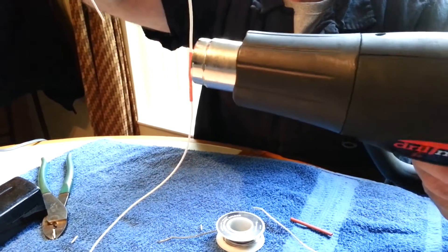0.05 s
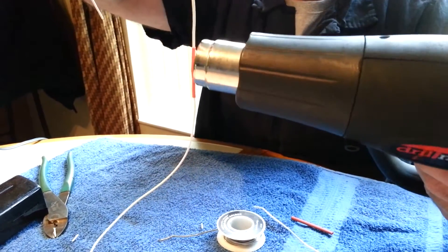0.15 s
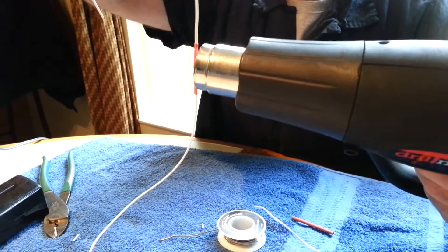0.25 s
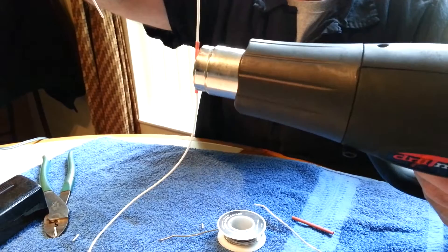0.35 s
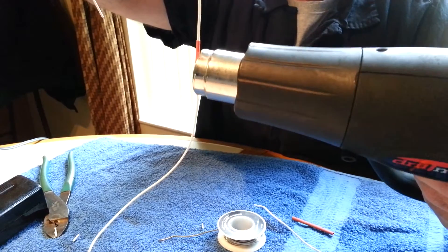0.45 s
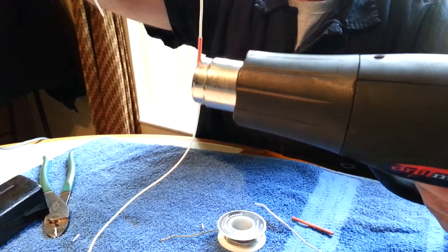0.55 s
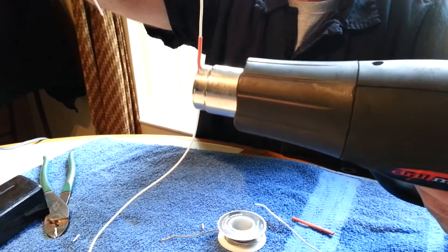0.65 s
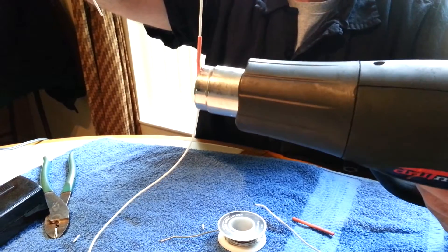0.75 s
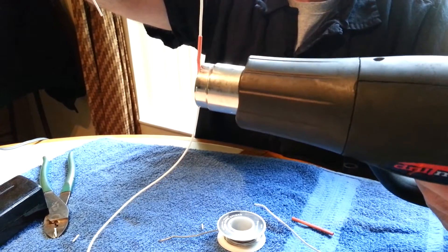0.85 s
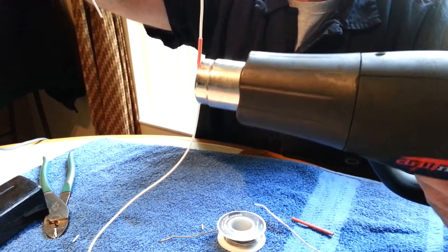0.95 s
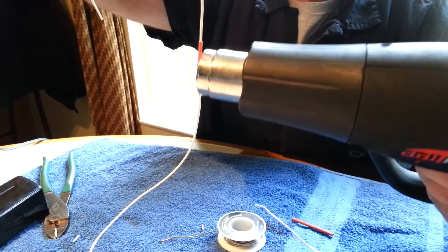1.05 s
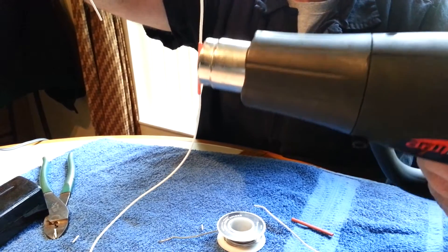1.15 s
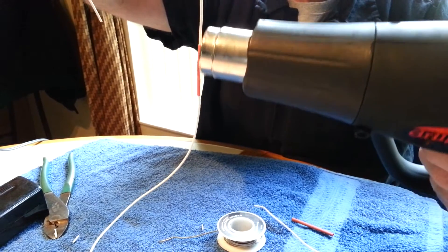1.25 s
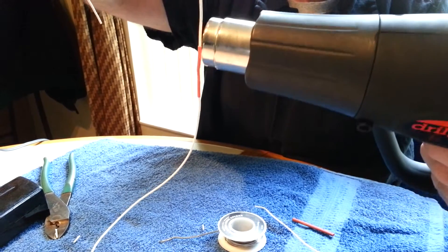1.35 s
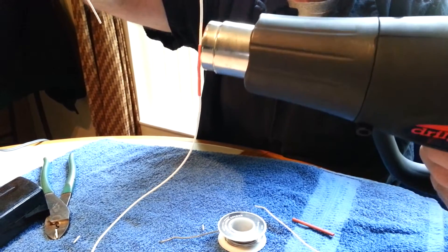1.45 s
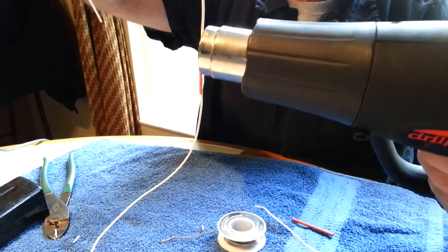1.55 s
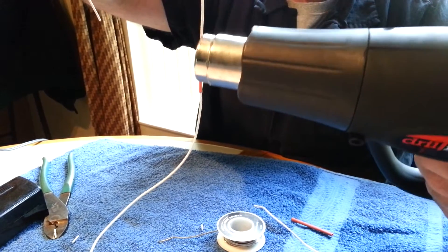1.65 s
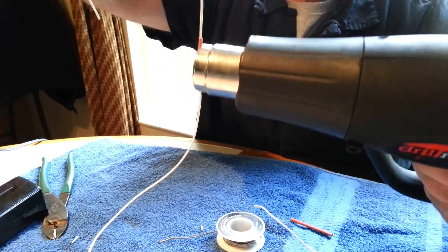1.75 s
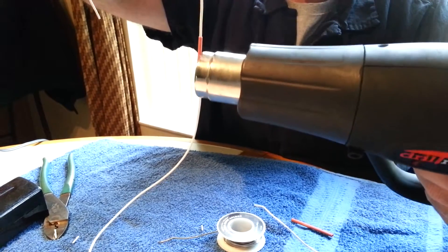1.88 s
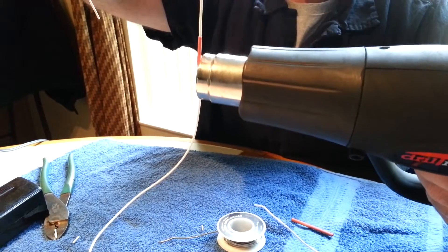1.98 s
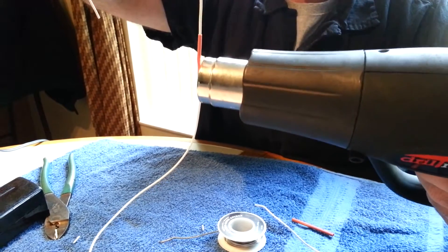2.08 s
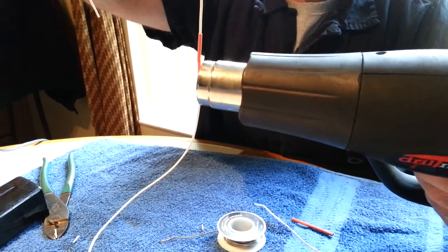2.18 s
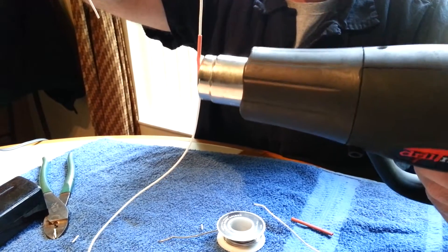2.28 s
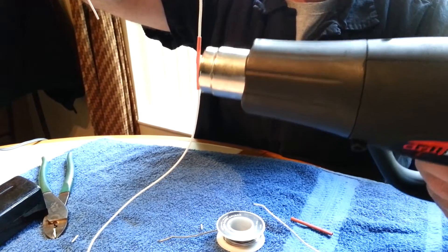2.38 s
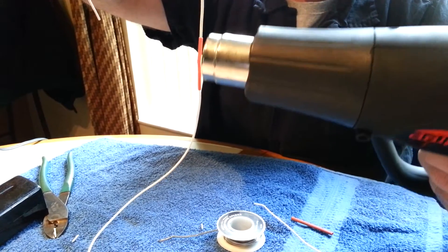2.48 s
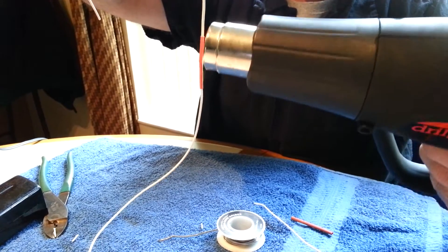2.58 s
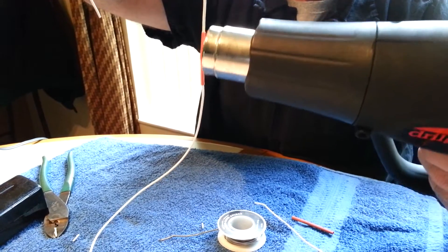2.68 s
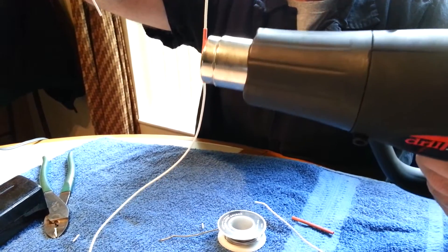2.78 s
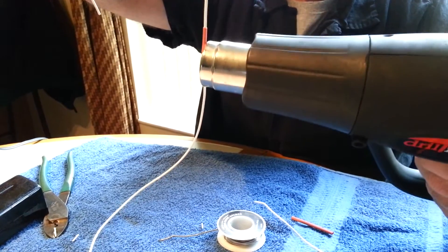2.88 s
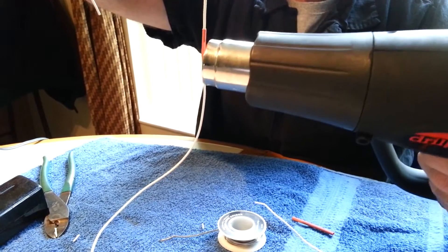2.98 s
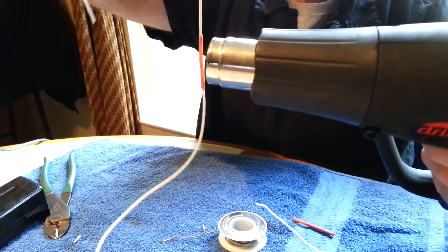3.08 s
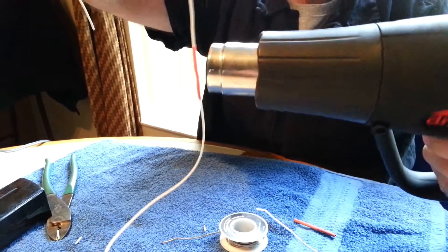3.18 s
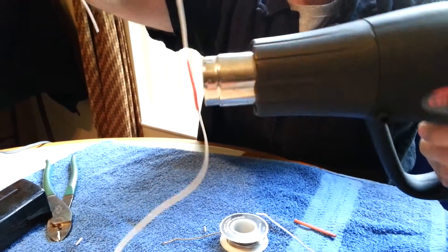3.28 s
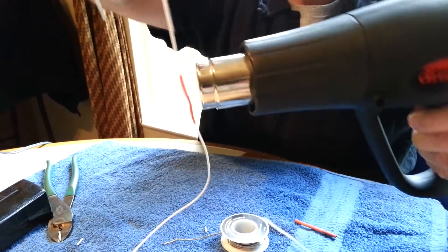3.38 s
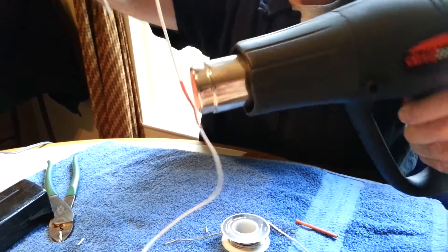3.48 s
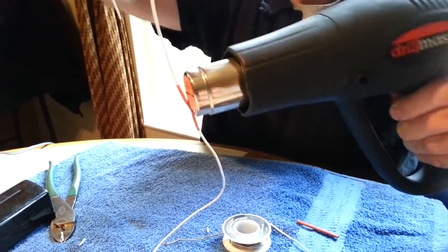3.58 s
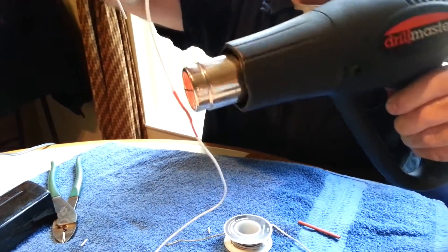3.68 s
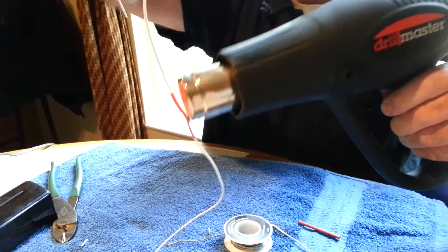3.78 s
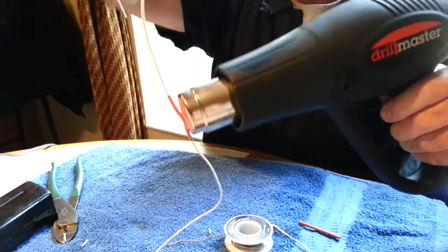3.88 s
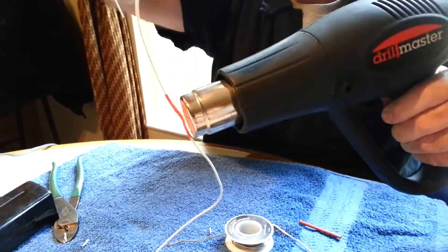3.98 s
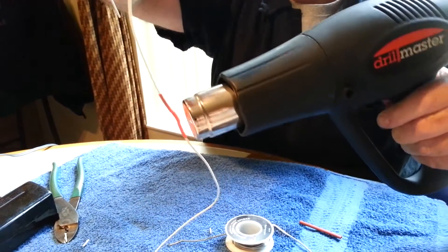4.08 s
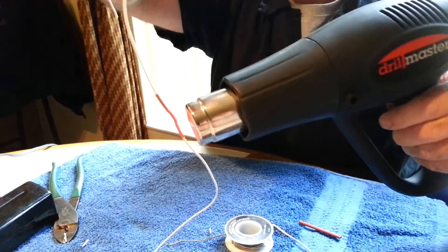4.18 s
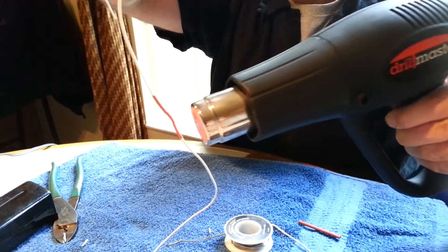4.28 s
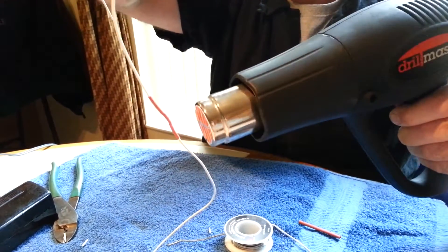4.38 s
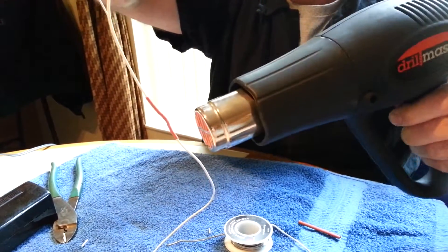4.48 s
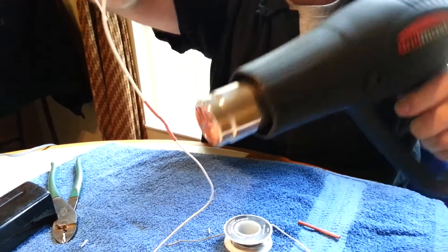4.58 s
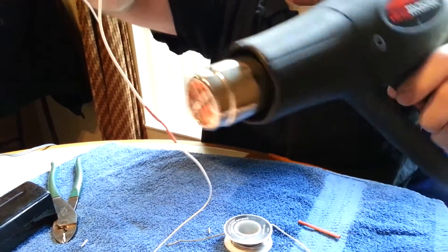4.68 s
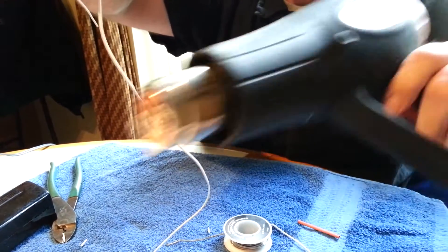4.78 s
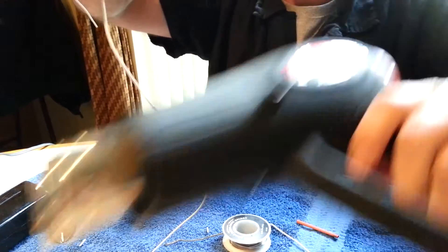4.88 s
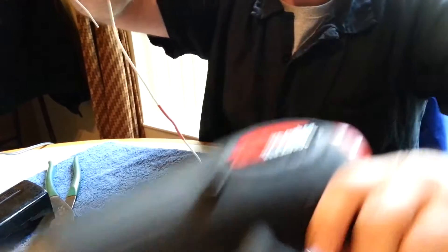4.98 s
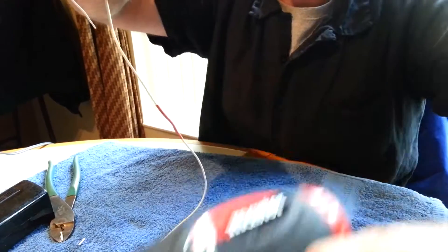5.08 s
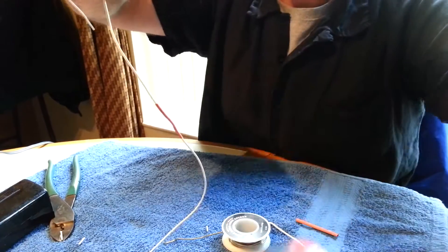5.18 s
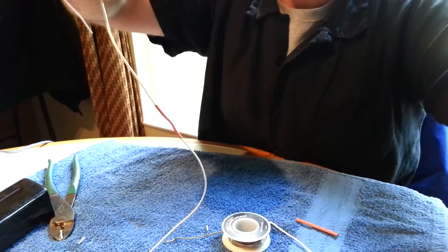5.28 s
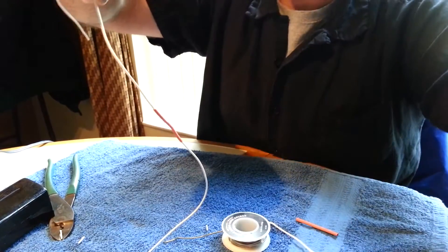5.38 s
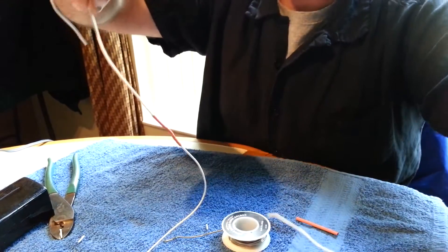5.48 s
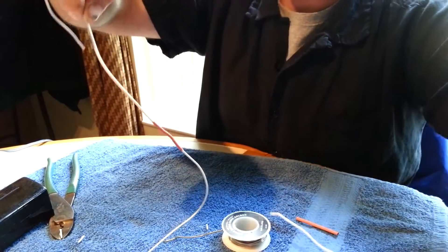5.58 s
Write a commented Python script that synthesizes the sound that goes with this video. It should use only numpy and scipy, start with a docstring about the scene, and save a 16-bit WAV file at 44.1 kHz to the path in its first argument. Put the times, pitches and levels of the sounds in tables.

```python
"""A heat gun blows over a wire joint close by: turbulence roars in the barrel and hisses at the nozzle,
and the fan hums and whines at harmonics of its shaft speed. At times the level jumps and settles back.
It is turned aside and switched off; friction slows the fan, so the tones glide down and the air fades.
The plastic clicks a few times, and the gun is set down with two knocks that ring the table top.
The room is small, and the right microphone hears little treble."""
import sys
import numpy as np
from scipy import signal
from scipy.fft import rfft, irfft, next_fast_len
from scipy.io import wavfile
from scipy.ndimage import map_coordinates

SR = 44100
rng = np.random.default_rng(int(sys.argv[2]) if len(sys.argv) > 2 else 0)


def log_audio(samples):
    """Write samples as a 16-bit WAV file to the path given in sys.argv[1]."""
    # one column per channel
    frames = np.atleast_2d(samples).T
    # limit to full scale, then quantise
    limited = np.clip(frames, -1, 1)
    pcm = np.round(limited * 32767).astype(np.int16)
    wavfile.write(sys.argv[1], SR, pcm)


N = 249165

# reverberation of the room: (frequency [Hz], t60 [s])
ROOM_DECAY = [(150, 0.26), (2000, 0.37), (10000, 0.39)]
# likeness of the two sides: (frequency [Hz], correlation [-1 to 1])
COHERENCE = [(130, 0.38), (240, 0.93), (400, 0.28), (600, 0.87), (1050, 0.87), (1400, 0.12), (2000, 0.053),
             (3300, 0.5), (4500, 0.38), (6700, 0.031)]
# right microphone against the left: (frequency [Hz], gain [dB], phase lag [rad])
RIGHT_RESPONSE = [(120, 4, 0.36), (257, -1.8, 0.3), (805, -2.5, .15), (1010, -4.5, 0.66), (1530, -1, -1.14),
                  (1980, 2, -0.35), (3160, -1, -0.96), (4200, -5.5, 1), (6800, -7.5, -0.16),
                  (8460, -15, -1.1), (13900, -44, 0)]
# gun meets table: (time [s], thump gain [dB], crack level [dB], t60 multiplier [ratio])
IMPACTS = [(5.4694, -6, -10.5, 0.9), (5.5788, -8, -13, 1.2), (5.6014, -16, -23, 0.88)]
# modes of table top and housing: (frequency [Hz], relative level [dB], t60 [s])
TABLE_MODES = [(98, -21, 0.18), (128, -11, 0.14), (171, -12.5, 0.15), (195, -8.5, 0.13), (244, 1.5, 0.061),
               (358, -8, 0.066), (410, -6.5, 0.03), (860, -9.5, .035), (1194, -13.5, 0.033),
               (1526, -14.5, 0.044), (3800, -29, 0.014), (4850, -14, .02)]
# struck housing: (frequency [Hz], relative spectral density [dB])
CRACK_SPECTRUM = [(60, -38), (250, 7), (900, 0), (2200, -8), (4200, -4.5), (6500, -12), (9000, -18.5),
                  (14000, -28)]
# switch and housing: (time [s], level [dB], centre [Hz], half-width [octaves], t60 [s], ring gain [dB])
SNAPS = [(4.3439, -8.5, 4440, 0.24, 0.017, -12.5), (4.3445, -16, 9000, 1.3, .008, -20),
         (4.9678, -24.5, 760, 0.52, 0.018, -21), (5.1626, -19.5, 3140, 0.82, 0.011, -20),
         (5.352, -16.5, 4950, 1.3, 0.0099, -29)]
# turning of the gun: (time [s], share turned aside [0-1])
TURN_PATH = [(3.1, 0.02), (3.5, 0.97)]
# brief jumps in the level of the sound: (peak time [s], height [dB], rise time [s])
LEVEL_JUMPS = [(.555, 1.5, .03), (1.02, 4.5, 0.035), (1.16, 4.5, 0.041), (1.545, 8.5, 0.0099),
               (1.74, 4.5, 0.034), (2.27, 5, .022), (3.07, 4.5, 0.076), (4.37, 6, 0.047)]
# fan tones: (order [multiple of shaft speed], side-on level [dB], turned-aside level [dB])
FAN_HARMONICS = [(1, -45, -43), (4, -36, -42), (11, -65, -58), (12, -35.5, -49), (15, -49.5, -42.5),
                 (16, -42, -73), (18, -50, -58), (19, -45, -52), (20, -41, -58), (24, -51, -47.5),
                 (25, -44.5, -53), (26, -52.5, -67), (30, -46.5, -50.5), (31, -38.5, -61), (35, -67, -42),
                 (36, -47, -61), (38, -42.5, -81), (39, -59, -41.5), (40, -33, -30.5), (41, -43, -36.5),
                 (44, -87, -36), (45, -33, -45), (46, -39.5, -40), (47, -73, -52), (50, -40, -55),
                 (51, -39.5, -56), (53, -44, -63), (55, -36.5, -46), (56, -42, -52), (58, -45, -53),
                 (59, -40, -54)]
# swing of the whine while the gun points aside: (time [s], relative level [dB])
WHINE_BEAM = [(3.35, -32), (3.404, -34), (3.482, -43.5), (3.538, -36), (3.668, -33.5), (4.096, -35.5),
              (4.226, -40), (4.33, -37.5)]
# what the shell radiates of a gliding tone: (frequency [Hz], level [dB])
SHELL_RESPONSE = [(200, -64), (600, -46), (1150, -50), (1500, -55), (2200, -56), (3400, -55.5),
                  (4300, -53.5), (5700, -46.5), (7500, -64), (10000, -49.5), (14000, -61)]
# low rumble of the flow: (frequency [Hz], relative spectral density [dB])
RUMBLE_SPECTRUM = [(30, -46), (55, -38), (80, -33), (128, -12), (160, -20), (210, -2.5), (300, -6),
                   (420, -9.5), (700, -38.5)]
# spectral shapes of the barrel's roar: (frequency [Hz], side-on [dB], turned aside [dB], coasting [dB])
BARREL_SPECTRA = [(325, -27, -33, -39), (448, -27, -23, -19), (531, -11.5, -15.5, -1.5), (637, -10, -4, -7),
                  (727, -6, -16, 1), (854.5, 2, 2, -1.5), (1070, 0, -8, 1), (1173, -7, -4.5, 4.5),
                  (1317, -14, -10, -13), (1850, -22, -23.5, -42)]
# spectral shapes of the nozzle's hiss: (frequency [Hz], side-on [dB], turned aside [dB], coasting [dB])
NOZZLE_SPECTRA = [(900, -15, -24, -37), (1430, -10, -5, -3), (2370, -8, -12, -12), (2660, -2.5, -0.5, -7),
                  (3180, -5, -11.5, -8), (3450, 1.5, -1.5, -7), (4330, -1, -1, 0.5), (5050, -8, -11.5, -6),
                  (6800, -17.5, -16.5, -3), (7350, -11.5, -11.5, -4.5), (10200, -9, -17, -6.5),
                  (12400, -10.5, -14, -11.5), (14600, -15.5, -15.5, -13.5)]

OFF_S, COAST_S = 4.343, 0.745  # power is cut; time in which the speed then falls by 1/e
AWAY_S, AWAY_TAKES_S = 4.88, 0.21  # the gun is swung away past the microphones
SHAFT_HZ, SAG_HZ, WANDER_HZ = 244.05, 0.5, 0.12  # the speed sags with the gun turned aside
BLADE_ORDERS, COMMUTATOR_SEGMENTS = (12, 18), 5
HOP = 64  # samples per step of a slow curve
TIME = np.arange(N) / SR


def amp(db):
    """Amplitude ratio of a level in decibels."""
    return 10 ** (np.asarray(db) / 20)


def along(points, hz, column=1):
    """A table column interpolated on a logarithmic frequency axis."""
    columns = np.transpose(points)
    return np.interp(np.log(hz + 1), np.log(columns[0] + 1), columns[column])


def wobble(rate, step=1):
    """Smooth random modulation: rate knots a second, one value every step samples."""
    coarse = np.arange(0, N, HOP)
    slow = map_coordinates(rng.standard_normal(int(N * rate / SR) + 4), [coarse * rate / SR])
    return np.interp(np.arange(0, N, step), coarse, slow)


def filtered(x, response):
    """Linear filtering: the spectrum is multiplied by a frequency response."""
    size = x.shape[-1]
    padded = next_fast_len(size + 8192)
    return irfft(rfft(x, padded) * response(np.fft.rfftfreq(padded, 1 / SR)), padded)[..., :size]


def noise(colour_db, size=N):
    """Partly coherent stereo noise of rms 1: the ratio of mid to side sets the correlation."""
    def response(hz):
        angle = np.arccos(np.clip(along(COHERENCE, hz), -1, 1)) / 2
        return amp(colour_db(hz)) * [np.cos(angle), np.sin(angle)]
    mid, side = filtered(rng.standard_normal((2, size)), response)
    pair = np.array([mid + side, mid - side])
    return pair / np.sqrt(np.mean(pair ** 2) + 1e-20)


def add(track, start_s, sound):
    """Superposition of a sound on the track."""
    part = track[:, round(start_s * SR):][:, :sound.shape[-1]]
    part += sound[..., :part.shape[-1]]


def room(x):
    """Reverberation: a diffuse tail decays exponentially, each frequency at its own rate."""
    hz, t, spectrum = signal.stft(noise(np.zeros_like, SR // 2), SR, nperseg=256)
    decay = amp(-60 * t / along(ROOM_DECAY, hz)[:, None])
    tail = signal.istft(spectrum * decay, SR, nperseg=256)[1]
    delayed = np.pad(tail, ((0, 0), (SR // 200, 0))) / np.linalg.norm(tail[0])
    return signal.fftconvolve(x, delayed, axes=1)[:, :N]


def table_knocks(crack_t60=0.036):
    """Impact excites damped modes: the table top thumps while the housing cracks."""
    out, t = np.zeros((2, N)), np.arange(SR // 3) / SR
    low_cut = signal.butter(2, 85, "high", fs=SR, output="sos")  # a small top radiates no deep bass
    for start_s, thump_db, crack_db, t60_scale in IMPACTS:
        modes = np.zeros_like(t)
        for k, (hz, db, t60) in enumerate(TABLE_MODES):
            envelope = amp(db + rng.normal(0, 1) - 60 * t / (t60 * t60_scale))
            modes += (-1) ** k * envelope * np.sin(2 * np.pi * hz * t)
        thump = signal.sosfilt(low_cut, modes)
        crack = noise(lambda hz: along(CRACK_SPECTRUM, hz), len(t)) * amp(-60 * t / crack_t60)
        add(out, start_s, amp(thump_db) * thump + amp(crack_db) * crack)
    return out


def plastic_clicks(ring_t60=0.083, lowest_hz=150):
    """Transients: each snap of plastic is a damped band of noise with a faint ring of the housing."""
    out, t = np.zeros((2, N)), np.arange(SR // 4) / SR
    for start_s, db, centre_hz, octaves, t60, ring_db in SNAPS:
        def band_db(hz):
            detuning = np.log2((hz + 1) / centre_hz) / octaves
            return -20 * np.log10(1 + detuning ** 2) - 40 * (hz < lowest_hz)
        envelope = amp(-60 * t / t60) + amp(ring_db - 60 * t / ring_t60)
        add(out, start_s, amp(db) * envelope * noise(band_db, len(t)))
    return out


def motion():
    """Shares (0-1) of full speed, which friction decays exponentially, of the turn and of the swing."""
    speed = np.exp(-np.maximum(TIME - OFF_S, 0) / COAST_S)
    aside = np.clip(np.interp(TIME, *np.transpose(TURN_PATH)), 0, 1)
    away = np.clip((TIME - AWAY_S) / AWAY_TAKES_S, 0, 1)
    return speed, aside, away


def jump_db(settle_s):
    """Level above the steady sound: each jump rises linearly and relaxes exponentially."""
    return sum(db * np.clip(1 + (TIME - peak_s) / rise_s, 0, 1)
               * np.exp(-np.maximum(TIME - peak_s, 0) / settle_s) for peak_s, db, rise_s in LEVEL_JUMPS)


def fan_tones(weak_db=-55, hum_db=1, blade_db=11.5, commutator_db=8.5, jitter=0.00028, spread_rad=0.068):
    """Periodic forcing: shaft, blades and commutator sound harmonics of one speed and fall together."""
    speed, aside, away = motion()
    shaft_hz = (SHAFT_HZ - SAG_HZ * aside + WANDER_HZ * wobble(3)) * speed * (1 + jitter * wobble(60))
    shaft_angle = 2 * np.pi * (np.cumsum(shaft_hz) / SR % 1)
    speed, aside, away = speed[::HOP], aside[::HOP], away[::HOP]
    gliding = np.clip((1 - speed) / 0.13, 0, 1)
    strong = {round(order): levels for order, *levels in FAN_HARMONICS}
    overall_db = -1.5 + 5.5 * np.log2(speed) - 7 * away
    lift_db = jump_db(settle_s=0.12)[::HOP]
    beam_times, beam_levels = np.transpose(WHINE_BEAM)
    beam_db = (np.interp(TIME[::HOP], beam_times, beam_levels) - beam_levels.mean()) * aside
    out = np.zeros((2, N))
    for order in range(1, 81):
        is_blade = order in BLADE_ORDERS
        is_commutator = order % COMMUTATOR_SEGMENTS == 0 and order > 20
        side_on_db, turned_db = strong.get(order, (weak_db, weak_db))
        sway_db = beam_db + 1.33 * wobble(16, HOP) + 0.45 * wobble(2.83, HOP)
        steady_db = side_on_db + (turned_db - side_on_db) * aside
        steady_db += hum_db if order == 1 else sway_db  # the long waves of the hum do not sway
        # a gliding tone leaves its resonance and flickers through the peaks and dips of shell and room
        glide_db = along(SHELL_RESPONSE, order * shaft_hz[::HOP]) + 0.1 * (side_on_db - weak_db) - 3
        glide_db += 3.5 * wobble(14, HOP)
        # these stay clear longest; the blades need speed to sing
        glide_db += blade_db * is_blade * np.sqrt(speed) + commutator_db * is_commutator
        jump_share = 0.86 if is_blade else 0.66
        gain = amp(overall_db + jump_share * lift_db + steady_db + (glide_db - steady_db) * gliding)
        phase = 2 * np.pi * rng.random()
        # high tones reach the two sides out of step
        offset = spread_rad * max(order - BLADE_ORDERS[0], 0) * rng.standard_normal((2, 1))
        out += np.repeat(gain, HOP)[:N] * np.cos(order * shaft_angle + phase + offset)
    return np.sqrt(2) * out


def turbulence(spectra, speed, aside):
    """Broadband flow noise: side-on, turned and coasting spectra crossfade at constant power."""
    coasting = np.clip((1 - speed) / 0.4, 0, 1)
    weights = np.sqrt([1 - aside, aside * (1 - coasting), aside * coasting])
    lowest_hz = spectra[0][0] / 2
    return sum(weight * noise(lambda hz: along(spectra, hz, column) - 120 * (hz < lowest_hz))
               for column, weight in enumerate(weights, start=1))


def airflow(roar_flutter_db=0.36, hiss_flutter_db=0.7, rumble_flutter_db=2.7):
    """Turbulence in barrel and nozzle radiates noise whose strength follows a power of the fan speed."""
    speed, aside, away = motion()
    halvings = -np.log2(speed)
    roar_db = -27 + jump_db(settle_s=0.079) - 4 * aside ** 2 - 9.5 * halvings - 6 * away
    hiss_db = -27.5 + 0.81 * jump_db(settle_s=0.08) - 2 * aside - 8 * halvings - 3 * away
    rumble_db = -51.5 + 3.5 * aside - 3 * halvings + rumble_flutter_db * wobble(12)
    roar = amp(roar_db + roar_flutter_db * wobble(35)) * turbulence(BARREL_SPECTRA, speed, aside)
    hiss = amp(hiss_db + hiss_flutter_db * wobble(24.7)) * turbulence(NOZZLE_SPECTRA, speed, aside)
    rumble = amp(rumble_db) * noise(lambda hz: along(RUMBLE_SPECTRUM, hz))
    return roar + hiss + rumble


def scene():
    """Direct and reverberant sound add; the room draws each falling tone out into a narrow band."""
    hits = plastic_clicks() + table_knocks()
    tones = fan_tones()
    falling = tones * (TIME > OFF_S)
    return airflow() + tones + hits + room(amp(-10) * hits + amp(-4) * falling)


def record(dry, overload=0.92, top_hz=14650):
    """Transduction: a dull right microphone, soft saturation and a steep band limit."""
    def right_response(hz):
        return amp(along(RIGHT_RESPONSE, hz)) * np.exp(-1j * along(RIGHT_RESPONSE, hz, column=2))
    heard = np.array([dry[0], filtered(dry[1], right_response)])
    saturated = heard / (1 + np.abs(heard / overload) ** 6) ** (1 / 6)
    return filtered(saturated, lambda hz: 1 / (1 + (hz / top_hz) ** 300))


dry = scene()
out = record(dry)
log_audio(out)
```